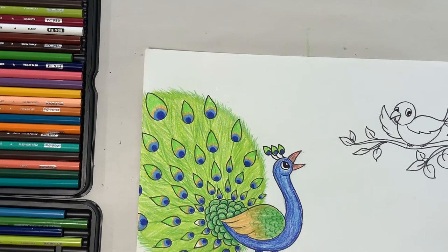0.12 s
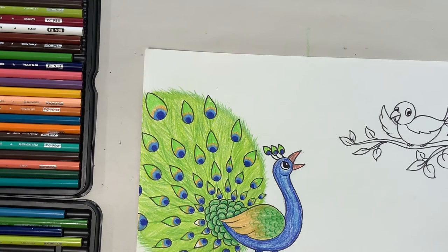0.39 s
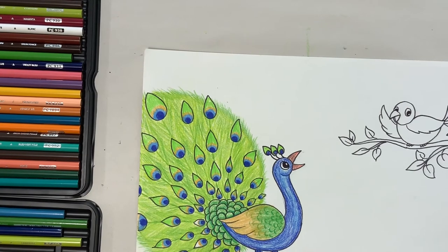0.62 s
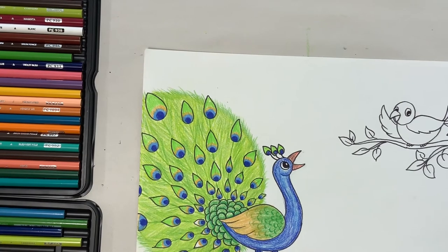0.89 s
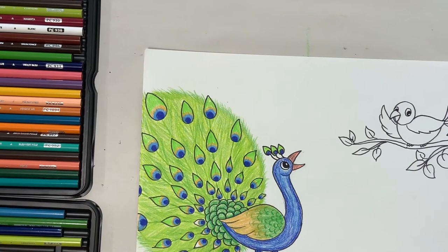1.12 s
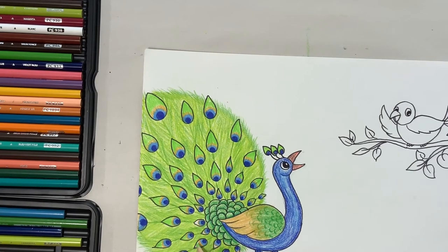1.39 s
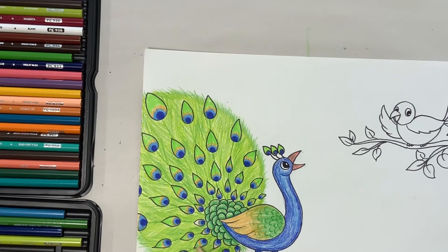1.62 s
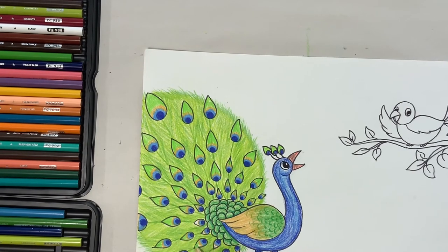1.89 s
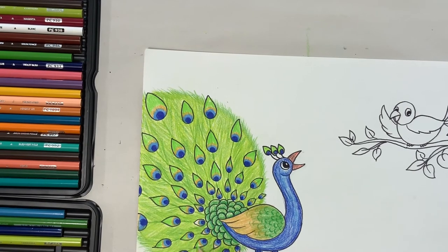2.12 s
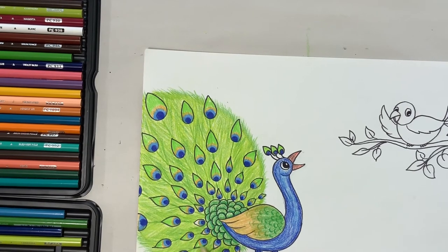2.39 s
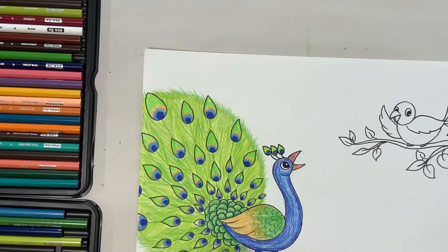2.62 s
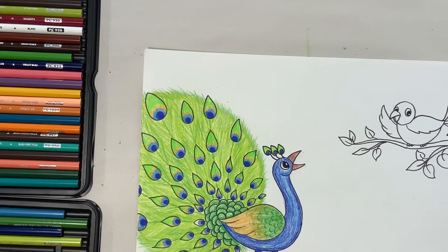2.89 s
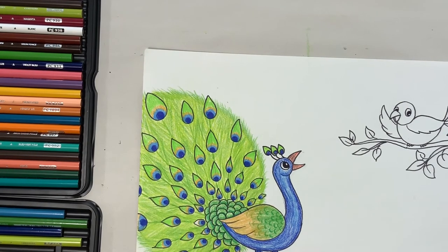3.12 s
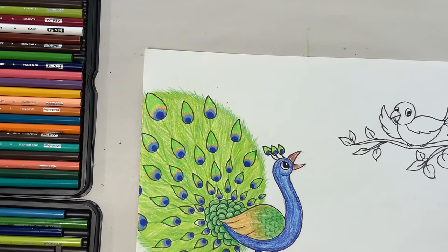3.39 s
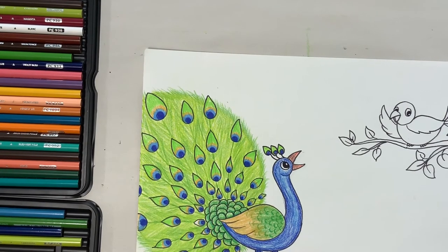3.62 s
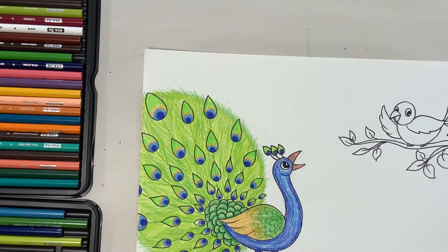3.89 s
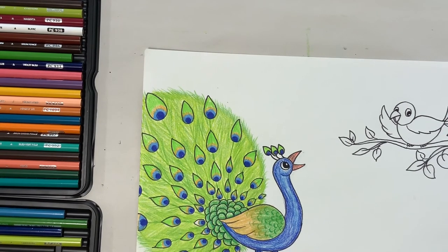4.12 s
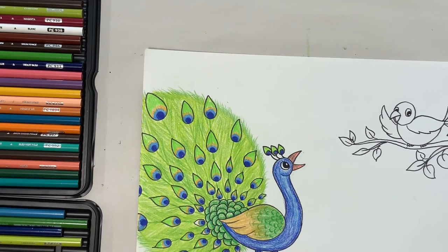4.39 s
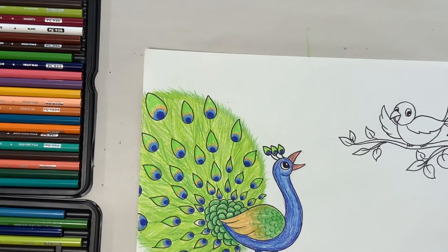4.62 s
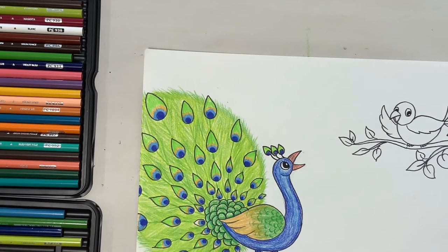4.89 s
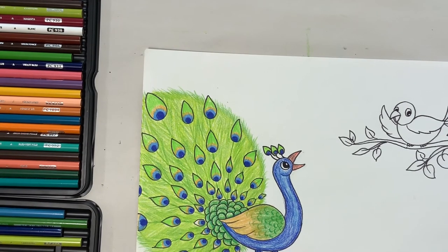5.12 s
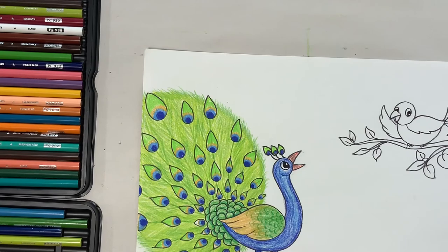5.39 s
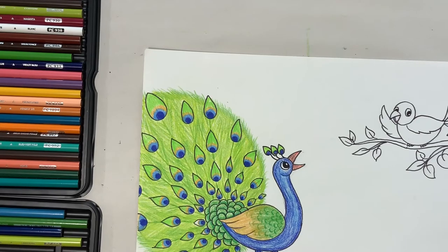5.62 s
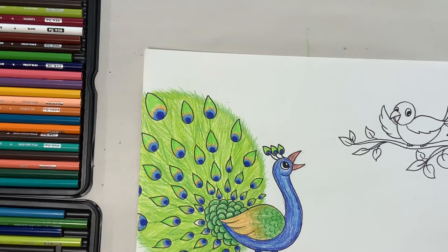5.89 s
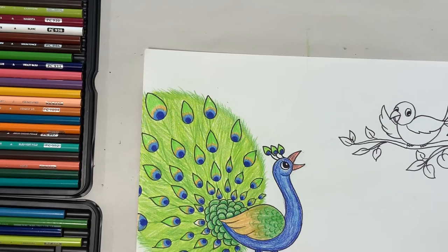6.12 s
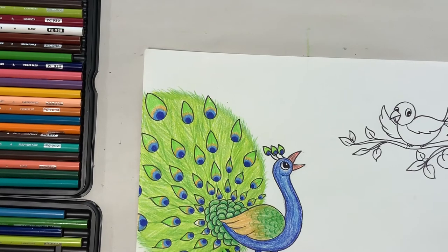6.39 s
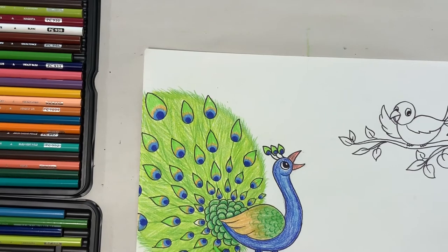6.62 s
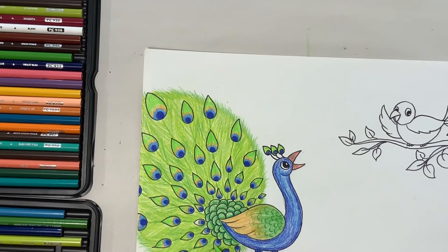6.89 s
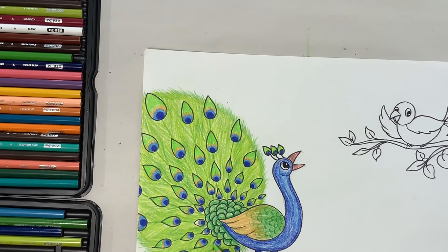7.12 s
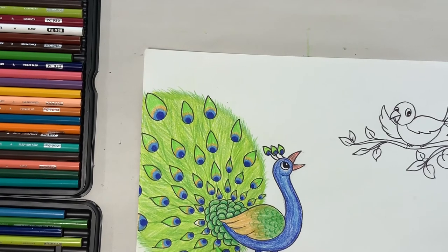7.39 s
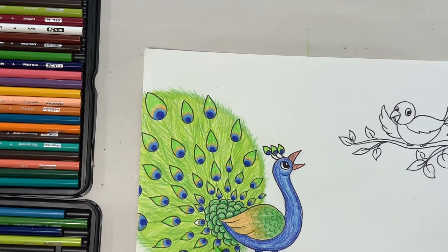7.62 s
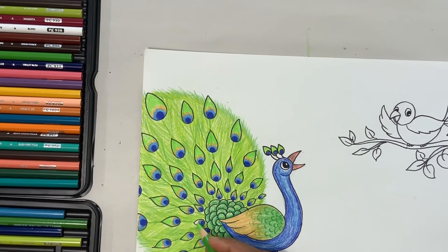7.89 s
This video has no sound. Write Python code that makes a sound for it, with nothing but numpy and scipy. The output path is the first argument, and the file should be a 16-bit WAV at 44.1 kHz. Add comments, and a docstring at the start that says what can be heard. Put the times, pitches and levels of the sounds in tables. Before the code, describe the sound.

In a quiet room with low constant ventilation rumble, a pencil scratches drawing paper on a desk. Bright, brisk rubs come first, then duller, woodier runs with pauses between, a coarse scraping drag, a light trailing scratch, and uneven later bursts with sharp little clicks and knocks. The stereo microphone is close, the pencil a little to the right, with a very short room tail and faint hiss.

```python
"""A ventilation rumble fills the room modes from the start, under air noise and faint microphone hiss. At once
a coloured pencil shades drawing paper in quick strokes, close to a stereo microphone and to its right. The lead
hisses over the paper's tooth and sounds the pencil and the desk under the sheet; soon it also ticks as it lands
or catches, and now and then a heavy drag rasps across the sheet. Longer rubs and a light trailing scratch come
between the runs. Shaped noise makes the rubs; short cracks and soft blows ring resonances for the ticks."""
import sys
import numpy as np
from scipy import signal
from scipy.fft import rfft, irfft, next_fast_len
from scipy.io import wavfile
from scipy.ndimage import uniform_filter1d, map_coordinates

SR = 44100
rng = np.random.default_rng(int(sys.argv[2]) if len(sys.argv) > 2 else 0)


def bounce(signal):
    """Save signal as a 16-bit WAV file at the path given by the first command-line argument."""
    frames = np.transpose(np.atleast_2d(signal))
    limited = np.clip(frames, -1, 1)
    pcm = np.round(limited * 32767).astype(np.int16)
    wavfile.write(sys.argv[1], SR, pcm)


def boost(x):
    """Linear amplitude factor 10**(x/20) for a level x in decibels (scalar or array-like)."""
    u = np.asarray(x, float) / 20
    return 10 ** u


N = 353241  # length in samples, about 8 s


def unit(x):
    """Scales x to an rms of 1."""
    return x / np.sqrt(np.mean(x ** 2) + 1e-20)


def along(points, hz):
    """Reads a curve of (pitch_hz, value) points on a log pitch axis."""
    point_hz, values = np.transpose(points)
    return np.interp(np.log(hz + 1), np.log(point_hz + 1), values)


def wobble(rate):
    """A smooth random curve with rate random points a second."""
    knots = rng.standard_normal(int(N * rate / SR) + 4)
    return map_coordinates(knots, [np.arange(N) * rate / SR])


def filtered(x, response):
    """Multiplies the spectrum of x by a complex response of frequency."""
    size = next_fast_len(N + SR // 2)
    return irfft(rfft(x, size) * response(np.fft.rfftfreq(size, 1 / SR)), size)[..., :N]


def resonant(x, modes, order=1):
    """Passes x through resonances that ring on after it, order times over for steeper skirts."""
    def one_pass(hz):
        total = 0
        for k, (center, width, db) in enumerate(modes):
            ring = 1j * hz * width / (center * center - hz * hz + 1j * hz * width)
            total = total + (-1) ** k * boost(db / order) * ring  # neighbours have opposite signs
        return total
    return filtered(x, lambda hz: one_pass(hz) ** order)


def patchy(x, depth_db):
    """Makes x louder and softer in random patches over time and frequency."""
    z = signal.stft(x, nperseg=256)[2]
    field = uniform_filter1d(rng.standard_normal(z.shape[-2:]), size=4, axis=0)
    field = uniform_filter1d(field, size=14, axis=1)
    return signal.istft(z * boost(depth_db * unit(field)), nperseg=256)[1][..., :N]


def in_turn(x, stages, gains_db):
    """Passes x through each stage's resonances, from that stage's start to the next one's."""
    stage = np.searchsorted([start for start, _ in stages], np.arange(N) / SR, 'right') - 1
    voices = []
    for (_, modes), db in zip(stages, gains_db):
        voices.append(boost(db) * unit(resonant(x, modes, order=2)))
    return np.choose(np.maximum(stage, 0), voices)


# low resonances of the room: pitch_hz, width_hz, relative level_db
ROOM_MODES = [(45.3, 8.1, -0.5), (66.3, 20, 1.5), (99.45, 19.7, 2), (135.94, 11.74, 3), (155.33, 9.7, 0.5),
              (183.4, 27.4, -8.5), (206.4, 6.8, -7)]
# colour of the air noise: pitch_hz, relative level_db per Hz
AIR = [(20, -1.5), (32, 7.5), (60, -8), (230, 0.5), (300, -6.5), (550, -11), (800, -14.5), (1100, -17.5),
       (1250, -21.5), (2000, -32), (3000, -38), (4600, -38), (6000, -37.5), (13500, -40.5), (14600, -45),
       (16000, -58)]
# how alike the air noise is at left and right: pitch_hz, likeness (1 = the same)
ALIKE = [(200, 0.75), (400, 0.66), (700, 0.28), (1500, 0.24), (5000, 0.12), (13000, 1)]
# narrow whistles in the air noise: pitch_hz, width_hz, level_db
AIR_TONES = [(366.8, 23, -76.5), (789.7, 9.5, -84)]


def ventilation():
    """Low noise rings the room modes alike at both ports; the air noise above is partly shared."""
    # noise that fills the whole filter length, so the modes already ring at the start
    low_noise = rng.standard_normal(next_fast_len(N + SR // 2))
    rumble = boost(-48.5) * unit(resonant(low_noise, ROOM_MODES, order=2))

    def mid_and_side(hz):
        angle = np.arccos(np.clip(along(ALIKE, hz), -1, 1)) / 2
        return boost(along(AIR, hz)) * [np.cos(angle), np.sin(angle)]
    pair = boost(0.46 * wobble(2.68)) * patchy(rng.standard_normal((2, N)), depth_db=1.85)
    mid, side = filtered(pair, mid_and_side)
    air = boost(-61.5) * unit(np.array([mid + side, mid - side]))

    tones = np.zeros(N)
    for hz, width, db in AIR_TONES:
        whistle = unit(resonant(rng.standard_normal(N), [(hz, width, 0)]))
        tones += boost(db + 1.8 * wobble(3.337)) * whistle
    return rumble + tones + air


# colour of the microphone hiss: pitch_hz, relative level_db
PREAMP = [(200, 11.5), (2500, -11.5), (8000, -11.5), (10000, -19), (16000, -20)]


def microphone_hiss():
    """Faint steady noise, the same in both channels."""
    return boost(-83.5) * unit(filtered(rng.standard_normal(N), lambda hz: boost(along(PREAMP, hz))))


# rubs on the paper: start_s, length_s, speed as hiss level_db, pressure as desk level_db
# (both levels before the crest and the layer gains)
STROKES = [(0.018, 0.063, -64.5, -78.5), (0.113, 0.064, -64, -80), (0.223, 0.061, -64, -79),
           (0.31, 0.064, -63, -80), (0.416, 0.055, -62.5, -82), (0.508, 0.061, -66.5, -78),
           (0.626, 0.062, -62.5, -97), (0.711, 0.055, -64.5, -80.5), (0.829, 0.051, -61.5, -76.5),
           (0.911, 0.062, -65, -83), (1.027, 0.055, -68.5, -86), (1.075, 0.13, -70, -77),
           (1.433, 0.043, -70.5, -76), (1.533, 0.055, -68, -74), (1.636, 0.076, -69, -75),
           (1.737, 0.053, -67.5, -75.5), (1.854, 0.055, -70, -74), (1.948, 0.071, -68.5, -76.5),
           (2.052, 0.052, -67.5, -77), (2.143, 0.054, -70.5, -79), (2.231, 0.056, -70.5, -83.5),
           (2.318, 0.048, -68, -82), (2.402, 0.082, -73, -92), (2.457, 0.18, -83.5, -91),
           (2.77, 0.066, -77, -81), (3.06, .07, -80, -101), (3.289, 0.066, -77, -82),
           (3.386, 0.057, -67.5, -71), (3.487, 0.071, -71, -75), (3.596, 0.058, -68.5, -73.5),
           (3.699, 0.055, -69.5, -72.5), (3.791, 0.055, -69, -73), (3.888, 0.048, -68, -75),
           (3.988, 0.048, -69.5, -75.5), (4.07, 0.057, -74, -80), (4.158, 0.048, -75.5, -80),
           (4.24, .11, -73, -95), (4.633, 0.05, -88, -79), (4.742, 0.045, -74, -77),
           (4.857, 0.05, -73, -76), (4.937, 0.057, -71.5, -77.5), (5.051, 0.063, -72.5, -76),
           (5.154, 0.06, -79, -77), (5.272, 0.036, -76, -86), (5.354, 0.088, -75.5, -88),
           (5.683, 0.048, -70.5, -76), (5.784, 0.055, -74.5, -73.5), (5.989, 0.048, -70, -77),
           (6.052, 0.044, -74, -85), (6.106, 0.059, -83, -104), (6.246, 0.097, -73, -82.5),
           (6.69, 0.06, -80, -85), (6.758, 0.045, -79, -76), (6.853, 0.043, -74, -76.5),
           (6.963, 0.059, -71.5, -72.5), (7.054, 0.07, -72.5, -73), (7.179, 0.026, -79, -77),
           (7.379, 0.026, -71, -76), (7.447, 0.04, -75, -71), (7.603, 0.26, -68, -93),
           (7.986, 0.076, -75, -79)]
# the grip: time_s, change of the pencil's scratch_db, rustle of the loose sheet against the hiss_db
GRIP = [(0, -2.5, -18.5), (.6, 3, -14), (1.2, 2, -12.5), (1.7, 2, -7.5), (2.3, 1.5, -12.5),
        (3.401, -0.5, -8), (4.15, 3.5, -4.5), (4.3, -3, -12.5), (5.2, 6, -11), (5.8, -6, -14),
        (6.299, 5.5, -9.5), (7.1, -0.5, -7.5), (7.5, -4, -10.5), (7.699, 5, -20)]
# the pencil's scratch follows both: level against the hiss_db, level against the desk_db
SCRATCH_FROM_DB = (-20.5, -13.5)
# a stroke's shape: level at its middle over the table, drop at its start,
# steepness of the rise, extra steepness of short rubs
CREST_DB, START_DB, RISE_POWER, ABRUPT_S = 5.5, 9.5, 2.65, 0.074
# drop at its end for flat lead, sheet, pencil, desk, tip: the desk rings on longest
END_DB, FALL_POWER = [[14], [13.5], [11.5], [6.5], [11]], 1.9
# longer rubs lay the lead flat, hiss smoothly and scratch less
FLAT_S, FLAT_SCRATCH_DB = 0.095, -4
TIP_DB = -2.04  # the upright tip against the tabled hiss


def stroke_effort():
    """Each rub swells and fades; speed drives the hiss and pressure drives the desk, over five layers."""
    t, effort = np.arange(N) / SR, np.zeros((5, N))  # flat lead, sheet, pencil, desk, tip
    grip_s, grip_scratch_db, sheet_db = np.transpose(GRIP)
    for start, length, hiss_db, desk_db in STROKES:
        flat = length > FLAT_S
        near = slice(max(int((start - length) * SR), 0), int((start + 3 * length) * SR))
        u = (t[near] - start) / length * 2 - 1  # -1 at the start, 0 in the middle, 1 at the end

        scratch = np.hypot(*boost(np.add([hiss_db, desk_db], SCRATCH_FROM_DB)))
        scratch *= boost(np.interp(start, grip_s, grip_scratch_db) + FLAT_SCRATCH_DB * flat)
        sheet = boost(hiss_db + np.interp(start, grip_s, sheet_db))
        tip = boost(hiss_db + TIP_DB) * (not flat)
        sizes = np.array([boost(hiss_db) * flat, sheet, scratch, boost(desk_db), tip])

        rise = START_DB * np.abs(u) ** (RISE_POWER + ABRUPT_S / length)
        fall = END_DB * np.abs(u) ** (FALL_POWER + flat)
        effort[:, near] += sizes[:, None] * boost(CREST_DB - np.where(u < 0, rise, fall))
    return effort


# resonances of the flat lead, its flank, the loose sheet, the pencil's scratch and the rasp:
# pitch_hz, width_hz, relative level_db
HISS = [(11300, 1600, -11.5), (13700, 1500, -2.5), (15400, 510, -7)]
FLANK = [(9600, 1700, -2.1), (11400, 2700, 0.17)]
RUSTLE = [(6160, 5800, -3.5), (8600, 6800, 2.5)]
SCRATCH = [(3910, 1200, -7), (4360, 700, 12.5), (5000, 1040, -6)]
RASP = [(1130, 1180, 2), (3520, 2600, 6), (8150, 12000, -2.5)]
# the desk's modes under the lead, which moves from spot to spot:
# start_s, then a list of pitch_hz, width_hz, relative level_db
DESK = [(0, [(1220, 600, 9), (2250, 220, -3)]), (1.3, [(1090, 650, -2), (1590, 360, 8.5),
        (2054, 450, 6.5)]), (4.5, [(1500, 540, 6), (2120, 590, 10.5), (2700, 350, 7), (3620, 1000, -5)]),
        (5.5, [(1430, 360, 3), (2000, 320, 4.5), (2555, 420, -1), (3740, 540, -18)]), (7.3, [(1500, 480, 3),
        (2010, 620, 4), (4060, 540, -6.5)])]
# how loud each spot sounds: gain_db
DESK_DB = [-3, -5, -1.5, -4, -4]
# the pencil's high modes shift with each new hold:
# start_s, then a list of pitch_hz, width_hz, relative level_db
HOLDS = [(0, [(9920, 680, -10), (10900, 450, -6), (11650, 770, -7.5), (13580, 990, -3), (14600, 610, -7.5),
         (15200, 300, -13)]), (1.3, [(10050, 510, -7), (11420, 320, 1.5), (11850, 560, -2.5),
         (13460, 1200, -2.5), (15400, 480, -15)]), (3.2, [(10240, 540, -7), (11850, 1200, -3.5),
         (12500, 550, 3.5), (13700, 880, -1.5), (15400, 680, -12)]), (4.5, [(11180, 460, -1.5),
         (12340, 730, 0), (13500, 1400, 0.5), (15400, 320, -26)])]


def rubbing():
    """Fibres pluck the lead in dense grains that sound tip, sheet, pencil and desk."""
    drag_swell, drag_hiss, drag_desk = drag_effort()
    flat, sheet, pencil, desk, tip = stroke_effort()
    flat = flat + drag_hiss
    desk = desk + drag_desk
    pencil = pencil + glide_effort()
    flank = flat * boost(-8)
    tooth = boost(0.77 * wobble(90) + 0.88 * wobble(400))  # the paper's uneven grain

    def grains():
        plucks = rng.standard_normal(N) * boost(4.3 * rng.standard_normal(N))
        return patchy(tooth * plucks, depth_db=2)

    def layer(body):
        return unit(resonant(grains(), body, order=2))

    sound = flat * layer(HISS) + flank * layer(FLANK)
    sound += sheet * layer(RUSTLE)
    sound += pencil * layer(SCRATCH)
    sound += desk * in_turn(grains(), DESK, DESK_DB)
    sound += tip * in_turn(grains(), HOLDS, np.zeros(len(HOLDS)))
    return sound + drag_swell * layer(RASP)


# how fast the room tail dies: pitch_hz, time to fall by 60 dB_s
REVERB = [(500, 0.27), (2000, 0.15), (6000, 0.087), (14000, 0.15)]
# colour of the room tail: pitch_hz, gain_db
WET = [(1000, -2), (3000, -0.5), (8000, -9.5), (14000, -15)]


def room(x):
    """A diffuse tail of fading noise, different at each port, its fade time set by pitch."""
    hz, t, z = signal.stft(rng.standard_normal((2, SR // 3)), SR, nperseg=128)
    fade = boost(-60 * t / along(REVERB, hz)[:, None])
    tail = signal.istft(z * fade, SR, nperseg=128)[1]
    tail = tail / np.linalg.norm(tail[0])
    wet = signal.fftconvolve(x[None], tail, axes=1)[:, :N]
    return filtered(wet, lambda hz: boost(along(WET, hz)))


# the lead lands or catches: time_s, snap_db, knock in the desk_db (both before the gains below)
TICKS = [(.419, -58, -69), (0.52, -55.5, -54), (.644, -38, -56), (.719, -58, -73), (1.1128, -52.5, -66),
         (1.3508, -66, -51), (2.4707, -46, -60), (2.793, -56, -67), (3.294, -61, -72), (4.224, -48, -68),
         (4.591, -62, -78), (4.741, -64, -77), (4.8274, -65, -65), (4.998, -62, -75), (5.594, -61, -78),
         (5.98, -43.5, -64), (6.0526, -44.5, -66), (6.5382, -61, -58.5), (6.7018, -56, -66),
         (7.514, -53, -72), (7.5995, -61, -51), (7.6413, -48, -70), (7.9676, -66, -60)]
# resonances of the lead's snap, the pencil's clack and the desk's knock: pitch_hz, width_hz, level_db
SNAP = [(9760, 2600, 1), (13000, 970, 9), (15700, 1200, -5)]
CLACK = [(1940, 1200, -0.5), (4400, 1250, 4)]
KNOCK = [(635, 310, 1), (1500, 560, -9.5)]
SNAP_DB, CLACK_DB, KNOCK_DB = -0.5, -5, 10.5  # gains of the three bodies
CRACK_T60_S, RATTLE_T60_S, RATTLE_DB = 0.0049, 0.018, -16  # times to fall by 60 dB
FRONT_DB = 10.5  # the first sharp break over the crackle
REBOUND_S, REBOUND_DB = 0.0028, -7  # a second, weaker break


def ticks():
    """A brief crack of the lead with a short rattle, a clack in the pencil and a dull knock in the desk."""
    cracks, blows, t = np.zeros(N + SR), np.zeros(N), np.arange(1024) / SR
    fade = boost(-60 * t / CRACK_T60_S) + boost(RATTLE_DB - 60 * t / RATTLE_T60_S)
    rebound = np.arange(len(t)) == round(REBOUND_S * SR)
    breaks = (t == 0) + boost(REBOUND_DB) * rebound / fade  # the division undoes the fade below
    for start, snap_db, knock_db in TICKS:
        noise = rng.standard_normal(len(t))
        crackle = noise / np.std(noise[:32])
        at = round(start * SR)
        cracks[at:at + len(t)] += boost(snap_db) * fade * (crackle + boost(FRONT_DB) * breaks)
        blows[round((start + 0.0025) * SR)] = boost(knock_db)
    soft_blows = np.convolve(blows, np.hanning(24), 'same')
    snap = boost(SNAP_DB) * resonant(cracks[:N], SNAP)
    clack = boost(CLACK_DB) * resonant(cracks[:N], CLACK)
    return snap + clack + boost(KNOCK_DB) * resonant(soft_blows, KNOCK)


# heavy drags that rasp over the whole band: peak_s, rise_s, fall_s, rasp_db, hiss_db
DRAGS = [(.648, 0.005, 0.024, -67.5, -86), (1.17, 0.085, 0.0093, -74, -103),
         (2.625, 0.028, 0.036, -58, -55), (6.015, .013, 0.015, -78, -79), (7.605, .006, 0.037, -74.5, -70)]


def drag_effort():
    """A heavy drag swells and falls in a moment, driving rasp, flat-lead hiss and desk together."""
    t, (rasp, hiss, desk) = np.arange(N) / SR, np.zeros((3, N))
    for peak, rise, fall, rasp_db, hiss_db in DRAGS:
        distance = np.abs((t - peak) / np.where(t < peak, rise, fall))
        swell = boost(-6 * distance ** 1.1)  # power 1 = pointed swell, 2 = round
        rasp += boost(rasp_db) * swell
        hiss += boost(hiss_db) * swell
        desk += boost(hiss_db - 5.5) * swell
    return rasp, hiss, desk


# the trailing pencil: middle_s, half length_s, level_db
GLIDE = (2.8, 0.25, -87.5)


def glide_effort():
    """The pencil trails lightly in one round swell that drives only its scratch."""
    middle, half_length, db = GLIDE
    return boost(db - 5 * ((np.arange(N) / SR - middle) / half_length) ** 2)


def scene():
    """Pencil, its room tail and the ventilation."""
    pencil = rubbing() + ticks()
    return pencil + room(pencil) + ventilation()


# how far the left port trails the right: pitch_hz, lag in whole turns of phase
LEFT_LAG = [(0, 0), (230, -.06), (600, -.15), (750, 0), (1730, 1), (2050, 1.4), (2820, 2), (3680, 3),
            (4800, 4), (5800, 5), (6900, 6), (8200, 7), (9500, 8), (22050, 17.84)]
# tone balance of the ports: pitch_hz, left minus right_db
TILT = [(125, -1.4), (500, -0.5), (1100, 0.5), (2100, -4), (3600, -2), (4400, 2.5), (5600, 0)]


def stereo_ports(dry):
    """Phase and level differ between the ports by pitch, each taking half the difference."""
    def response(hz):
        turns = np.interp(hz, *np.transpose(LEFT_LAG))
        phase = np.exp(1j * np.pi * np.outer([-1, 1], turns))
        return phase * boost(np.outer([0.5, -0.5], along(TILT, hz)))
    return filtered(dry, response)


def low_pass(x):
    """Removes everything above the highest recorded frequency."""
    return signal.sosfilt(signal.butter(12, 15640, fs=SR, output="sos"), x)


def record(dry):
    """The two ports colour the sound, then the microphone hiss joins."""
    mix = stereo_ports(dry) + microphone_hiss()
    return low_pass(mix)


dry = scene()
out = record(dry)
bounce(out)
```